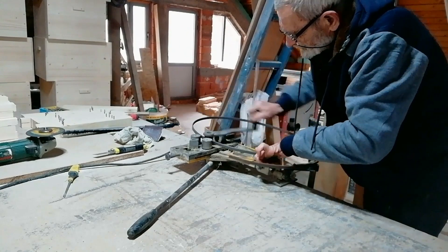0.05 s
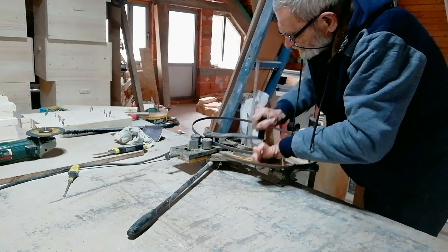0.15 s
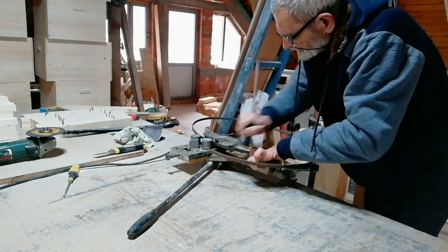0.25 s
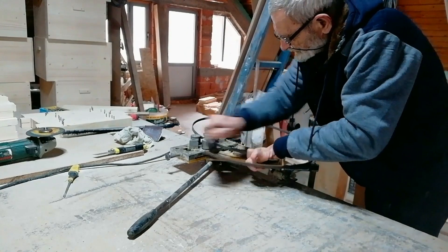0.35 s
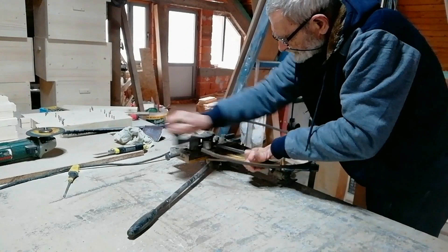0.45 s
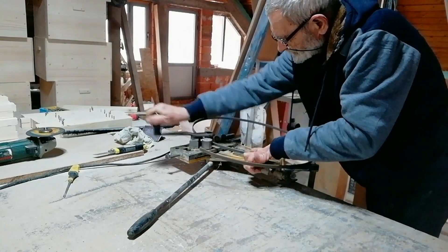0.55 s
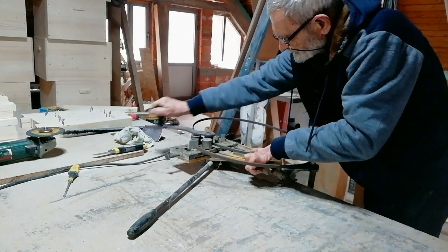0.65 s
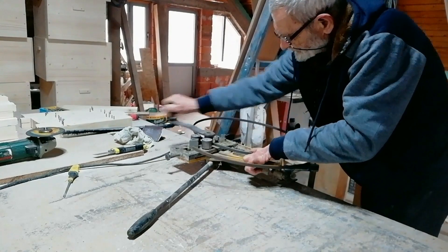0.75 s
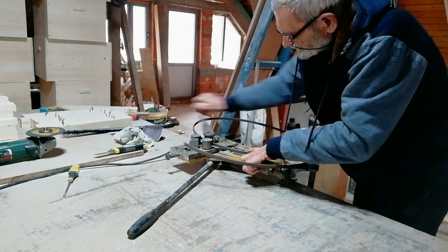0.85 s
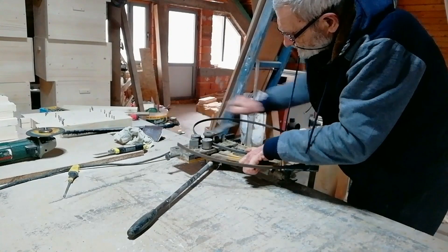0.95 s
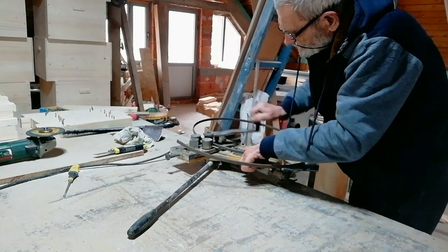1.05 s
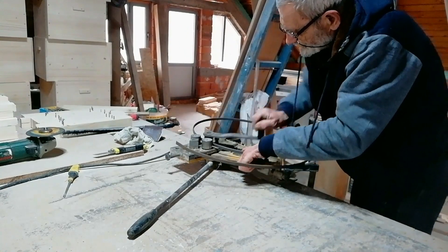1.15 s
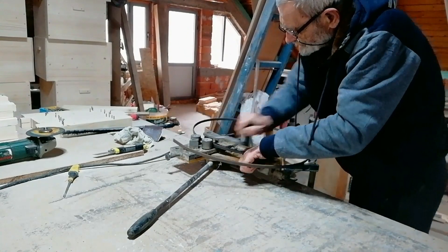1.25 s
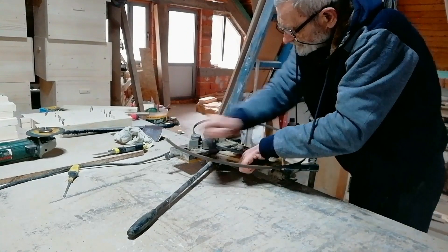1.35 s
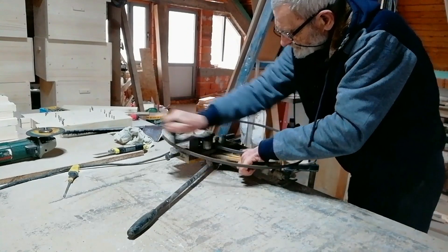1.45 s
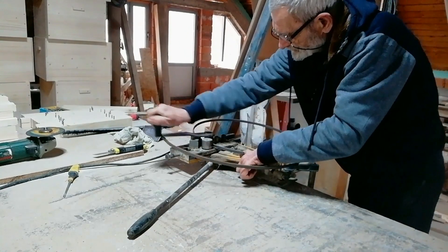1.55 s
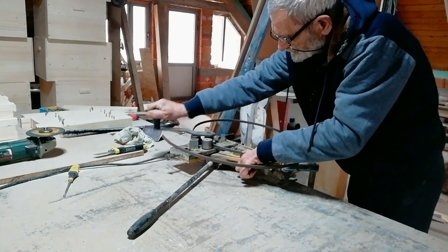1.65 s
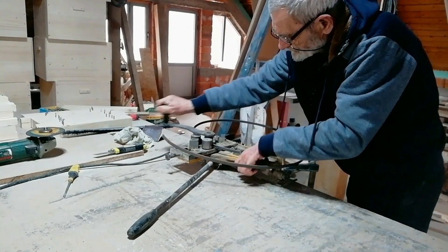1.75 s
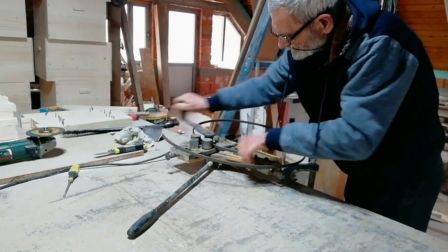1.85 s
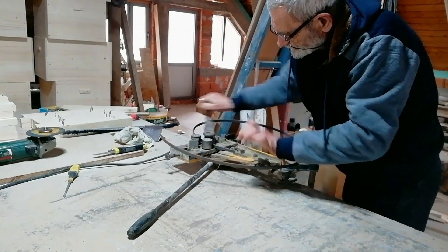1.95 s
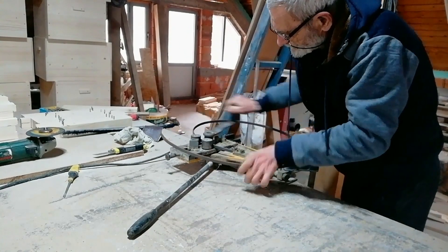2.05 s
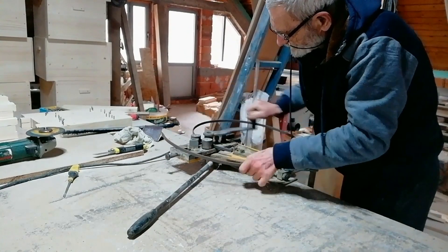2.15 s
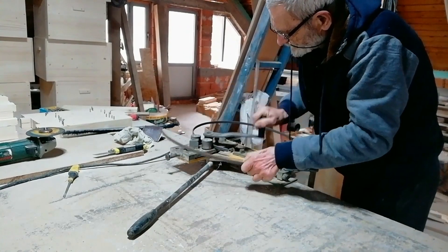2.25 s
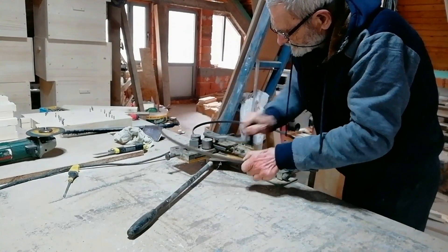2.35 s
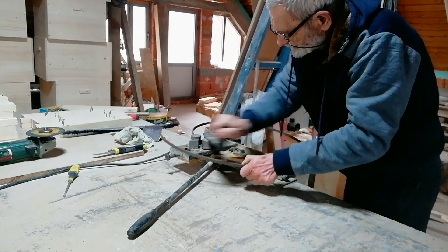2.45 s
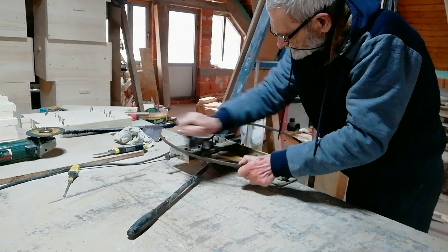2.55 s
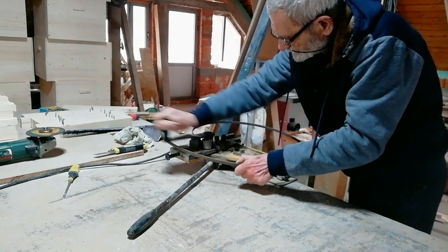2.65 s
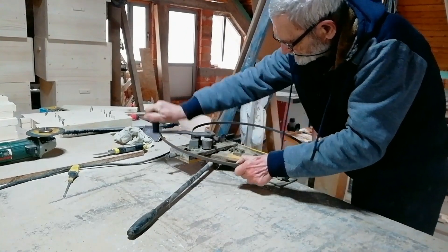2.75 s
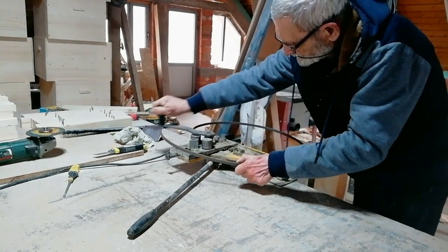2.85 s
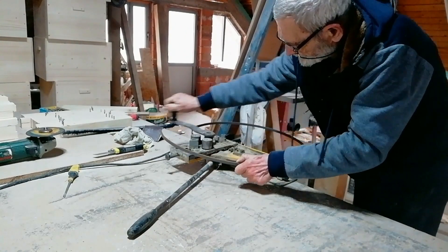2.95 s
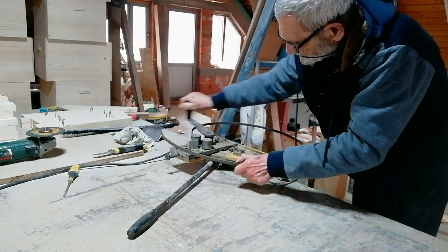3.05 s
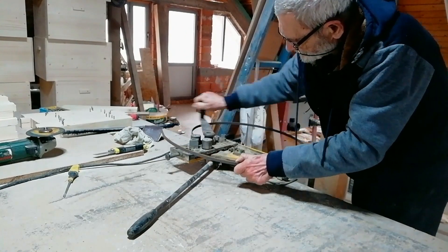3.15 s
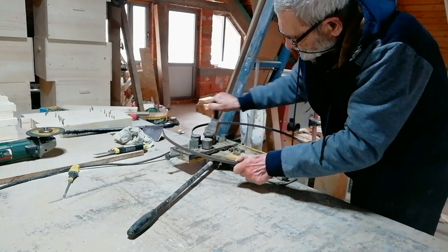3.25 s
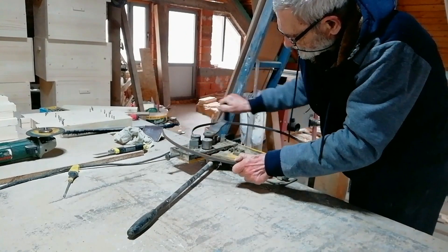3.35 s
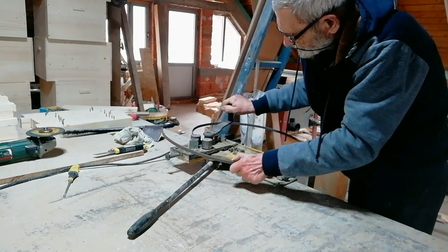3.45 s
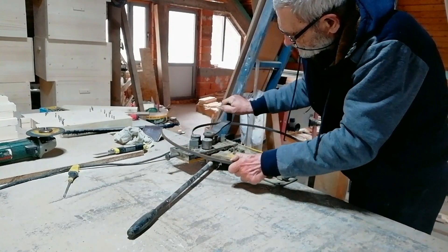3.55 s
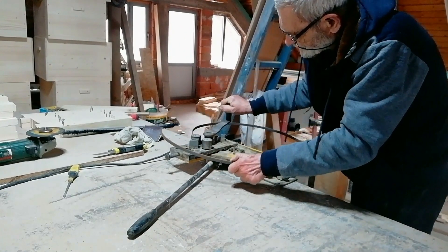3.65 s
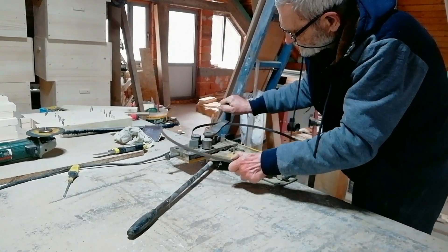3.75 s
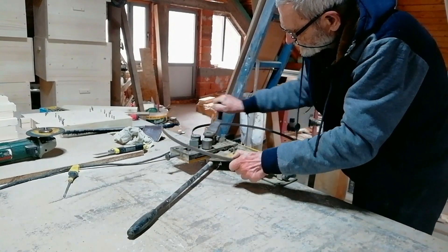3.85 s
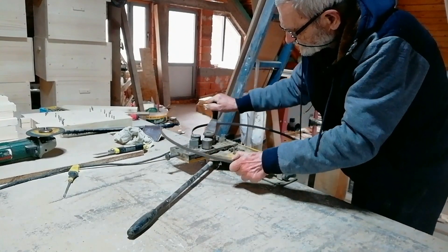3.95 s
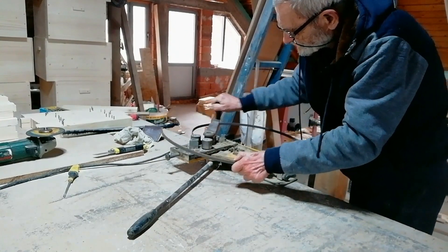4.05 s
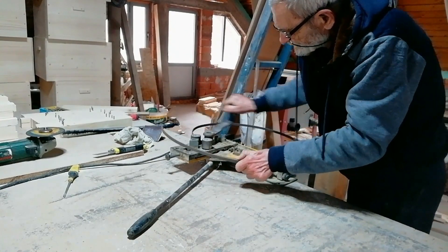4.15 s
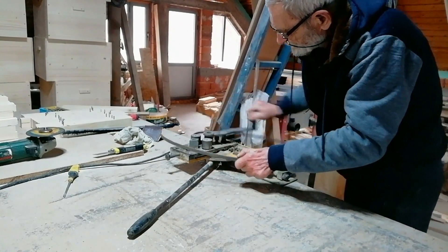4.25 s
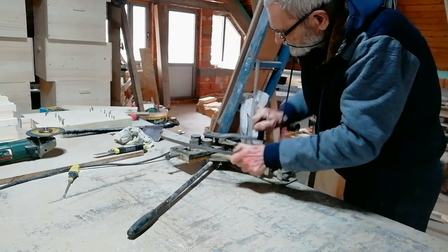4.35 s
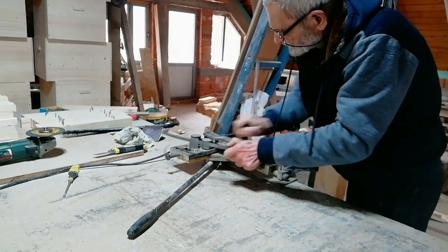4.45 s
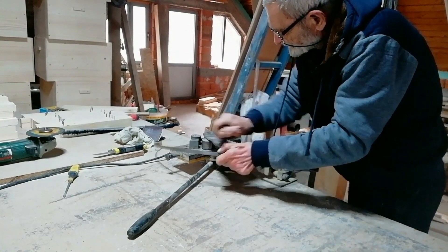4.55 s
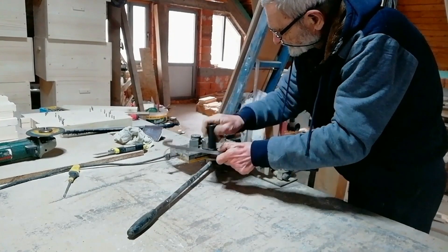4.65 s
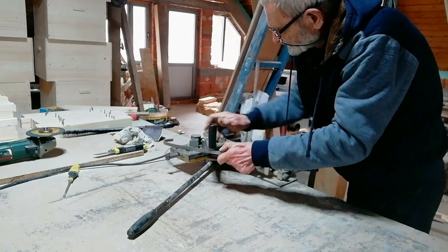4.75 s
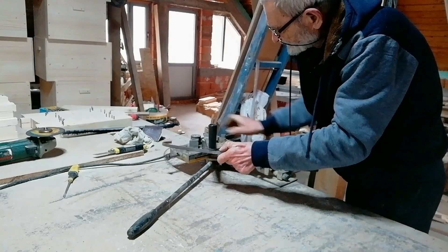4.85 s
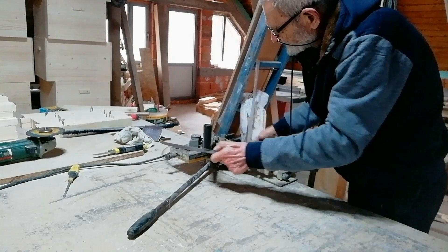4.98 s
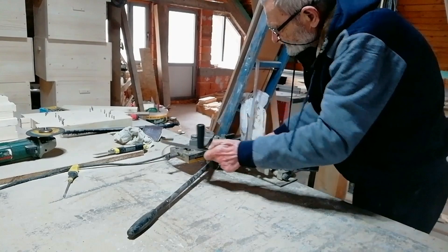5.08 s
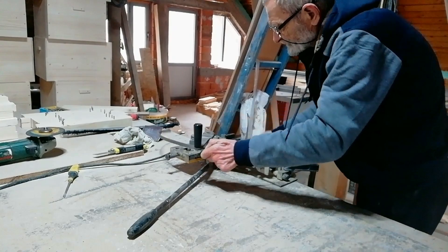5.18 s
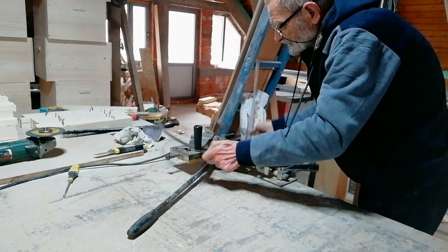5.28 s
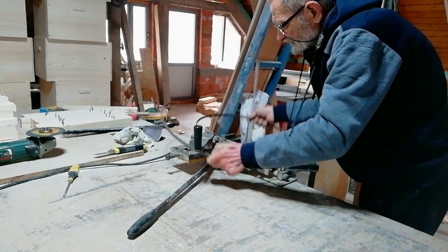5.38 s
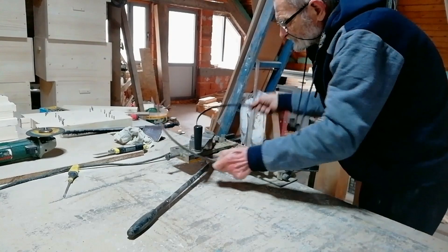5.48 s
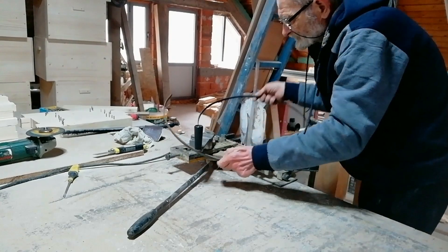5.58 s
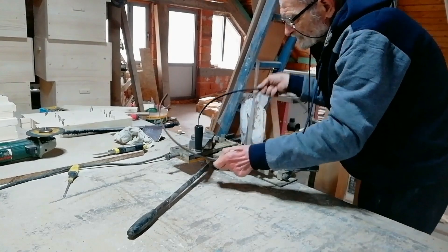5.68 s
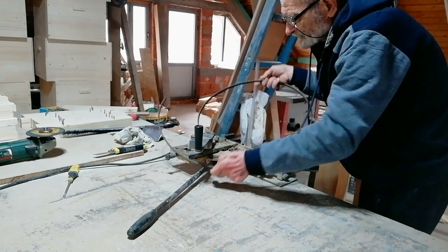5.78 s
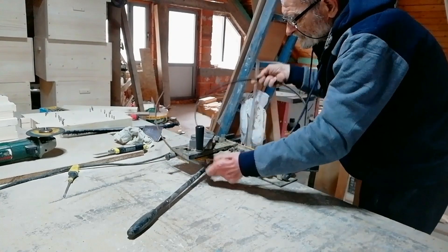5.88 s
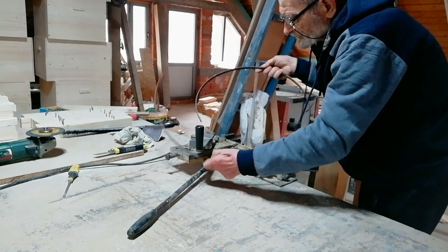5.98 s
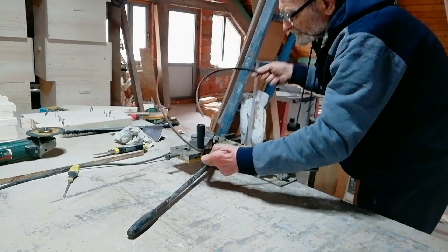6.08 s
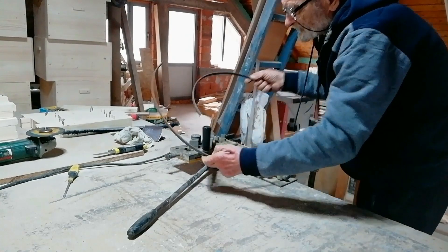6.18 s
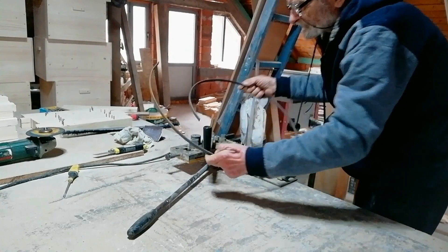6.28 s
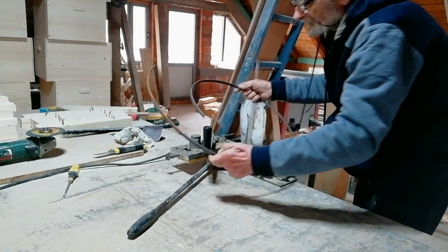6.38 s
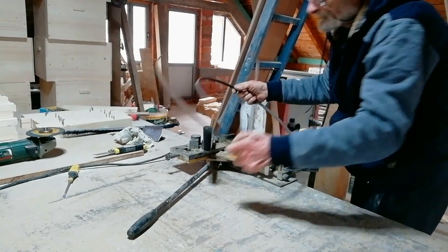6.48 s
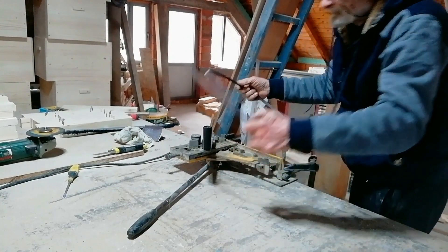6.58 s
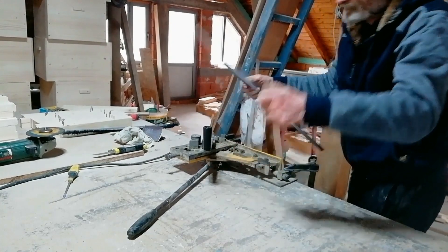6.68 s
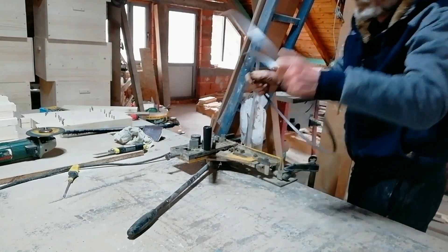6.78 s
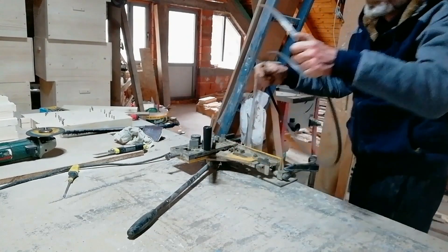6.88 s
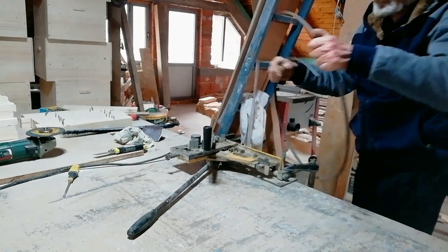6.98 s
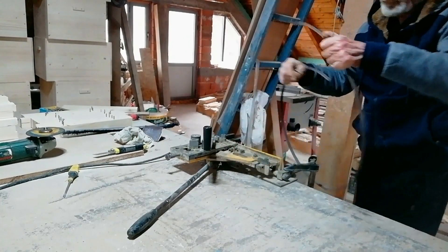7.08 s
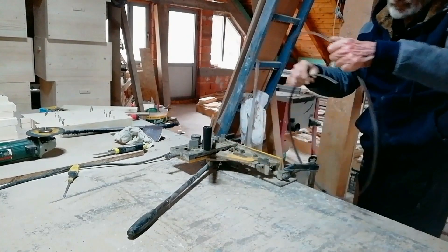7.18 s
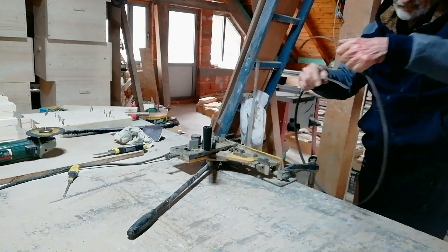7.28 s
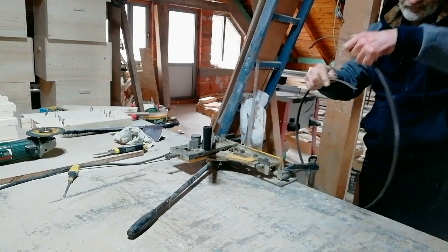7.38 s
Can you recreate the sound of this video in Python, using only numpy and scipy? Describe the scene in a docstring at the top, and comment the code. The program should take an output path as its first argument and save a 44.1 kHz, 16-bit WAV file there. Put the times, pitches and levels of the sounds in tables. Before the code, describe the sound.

Metal handwork in a small, briefly reverberant room. Soft sliding and low squeaks surround a ringing clank; another hard clack makes the bar twang and the bench thump. It goes nearly silent, then steel scrapes and bangs rapidly in the jig, with smaller clicks following. Two or three final knocks give way to a sleeve's airy rustle. The microphone is near the bench, with faint background air.

```python
"""A flat steel bar is worked through a hand bending jig on a wooden bench, in a small workshop.
First the bar slides over the rollers and clanks on the pins: random slips and noise bursts ring the steel.
Then it is scraped and knocked free. Squeaks, notes and twangs are gliding or fading sines, and low noise
makes the bench boom along. Small cloth rustles come early on; at the end a sleeve swishes, made of dense
slips, as the bent bar is lifted away. Quiet air noise lies under it all."""
import sys
import numpy as np
from scipy import signal
from scipy.fft import rfft, irfft, next_fast_len
from scipy.io import wavfile
from scipy.ndimage import uniform_filter1d, map_coordinates

SR = 44100
rng = np.random.default_rng(int(sys.argv[2]) if len(sys.argv) > 2 else 0)


def wav_record(signal):
    """Record a signal, one row per channel, as 16-bit PCM in the file named by sys.argv[1]."""
    frames = np.transpose(np.atleast_2d(signal))
    bounded = np.clip(frames, -1, 1)
    # unit amplitude maps onto the largest positive 16-bit level
    quanta = np.round(bounded * 32767).astype(np.int16)
    wavfile.write(sys.argv[1], SR, quanta)


N = 327222  # length in samples
PORT_LAG = 27  # samples by which the direct sound reaches the left port later

# The jig on its bench rings at these pitches. Each row: pitch in Hz, width in Hz, level in dB.
FRAME_MODES = [(454, 6.8, 4.5), (733, 159.6, -0.5), (890, 12, 3), (1020, 52, 1), (1268, 210, -1),
               (1586, 12.5, -13.5), (1966, 38, -5), (2418, 32.8, -11), (3160, 100, -8), (3322, 120, -8.5)]
# The pitches at which the steel pins ring, in Hz.
PIN_HZ = [1398, 2805, 3720, 5469, 6320, 7001, 8626, 9040, 9394, 10515, 10884]
# How each of those pitches rings. Each row: level in dB, time to fall by 60 dB in seconds.
PIN_RING = [(-22, 0.45), (-29.5, 0.33), (-32, 0.31), (-27, 0.24), (-36, .2), (-23.5, 0.18), (-21, 0.14),
            (-8, 0.14), (-3, 0.2), (-7.5, 0.22), (-3, 0.11)]
# How a push takes hold, swells and dies: attack in seconds, swell in dB, release in dB a second.
PUSH_SHAPE = (0.0653, 0.99, 161)


def amp(db):
    """Turn decibels into a gain."""
    return 10 ** (np.asarray(db) / 20)


def unit(x):
    """Scale to an average (rms) level of 1."""
    return x / np.sqrt(np.mean(x ** 2) + 1e-20)


def along(points, hz):
    """Read a curve of (Hz, value) points, with pitch on a log axis."""
    f, v = np.transpose(points)
    return np.interp(np.log(hz + 1), np.log(f + 1), v)


def wobble(rate):
    """A smooth random curve with `rate` random points a second."""
    knots = rng.standard_normal(int(N * rate / SR) + 4)
    return map_coordinates(knots, [np.arange(N) * rate / SR])


def filtered(x, response):
    """Multiply the spectrum of x by a response that depends on pitch."""
    m = next_fast_len(N + 8192)
    return irfft(rfft(x, m) * response(np.fft.rfftfreq(m, 1 / SR)), m)[..., :N]


def coloured(x, spectrum):
    """Shape x by the given spectrum, at rms 1."""
    return unit(filtered(x, lambda hz: amp(along(spectrum, hz))))


def band(x, lo_hz, hi_hz, order=3):
    """Keep the pitches between two edges."""
    edges_hz = [lo_hz, min(hi_hz, SR / 2 - 1)]
    return signal.sosfilt(signal.butter(order, edges_hz, "band", fs=SR, output="sos"), x)


def add(track, s, sound):
    """Mix a sound into a track at s seconds."""
    start = max(round(s * SR), 0)
    track[..., start:start + sound.shape[-1]] += sound[..., :N - start]


def ringing(x, modes):
    """The answer of resonances (Hz, width Hz, dB) to x."""
    def response(f):
        return sum(amp(db) * 1j * f * width / (hz * hz - f * f + 1j * f * width)
                   for hz, width, db in modes)
    return filtered(x, response)


def resonate(x, modes, share_db):
    """Mix x with its own ringing, at rms 1."""
    return unit(unit(x) + amp(share_db) * unit(ringing(x, modes)))


def evened(x, width_hz=350):
    """Level out the chance peaks and dips in a short burst's spectrum: a clean, broad crack."""
    z = rfft(x)
    power = np.abs(uniform_filter1d(np.abs(z) ** 2, int(width_hz * len(x) / SR)))
    return irfft(z * np.sqrt(power.mean() / (power + 1e-12)), len(x))


def diffuse(size, merge_hz=330):
    """Noise at two ports: alike in the bass, unrelated above."""
    hz = np.fft.rfftfreq(size, 1 / SR)
    turn = np.arccos(.96 / (1 + (hz / merge_hz) ** 4)) / 2
    noise = rfft(rng.standard_normal((2, size)))
    mid, side = irfft(noise * [np.cos(turn), np.sin(turn)], size)
    return np.array([mid + side, mid - side])


def workshop(direct_db, near_db=3, near_t60=0.055):
    """Echo pattern at two ports: the direct path, close echoes off the bench, then the room's tail."""
    # Each row: pitch in Hz, time for the room's tail to fall by 60 dB in seconds.
    room_decay = [(100, 1), (300, 0.61), (1000, 0.43), (3000, 0.34), (7000, 0.3), (14000, 0.21)]
    hz, t, z = signal.stft(diffuse(size=SR // 2), SR, nperseg=256)
    tail = amp(-60 * t / along(room_decay, hz)[:, None])
    near = amp(near_db - 60 * t / near_t60)
    response = signal.istft(z * (tail + near), SR, nperseg=256)[1]
    response /= np.linalg.norm(response[0])
    response[[0, 1], [PORT_LAG, 0]] += amp(direct_db)
    return response


def friction(rate, spread_db, direct_db):
    """Tiny slips of unequal size at a spot that moves between two places, each with its own echoes."""
    place = (1 + np.tanh(1.5 * wobble(6))) / 2
    out = np.zeros((2, N))
    for share in (place, 1 - place):
        size = amp(spread_db * np.minimum(rng.exponential(size=N), 2))
        happens = rng.random(N) < share * rate / SR  # rate: slips a second
        slips = happens * rng.uniform(-1.02, 1, N) * size
        out += signal.fftconvolve(slips[None], workshop(direct_db), axes=1)[:, :N]
    return out


def stroke(start, length, attack_s, swell_db, release_db):
    """Gain of one movement: it eases in, swells by swell_db to its end, then falls by release_db a second."""
    t = np.arange(N) / SR - start
    to_go = np.clip(1 - t / length, 0, 1)
    ease_in = (1 + np.tanh(2 * t / attack_s)) / 2
    return ease_in * amp(-swell_db * to_go - release_db * np.maximum(t - length, 0))


def strokes(rows, shape):
    """Rub, grind and hiss gains of a series of movements; their powers add."""
    power = 0
    for s, length, db, grind_db, hiss_db in rows:
        peaks = amp([db, db + grind_db, db + hiss_db])
        power = power + np.outer(peaks, stroke(s, length, *shape)) ** 2
    return np.sqrt(power)


def rubbing(slips, tone, levels, frame_db, steel_db, split_hz=1400):
    """Slips shake the jig's frame (a low rub, a harder grind) and, higher up, its steel pins."""
    # Colour of the hiss. Each row: pitch in Hz, level in dB per Hz.
    hiss_tone = [(2350, -12), (4000, -3), (5220, -15), (7660, 0.5), (9330, -1.5), (10800, -0.5),
                 (14900, -18), (15600, -31), (16000, -62.5)]
    # a shorter ring makes a wider resonance
    pins = [(hz, 2.8 / t60 + 25, db) for hz, (db, t60) in zip(PIN_HZ, PIN_RING)]
    body = resonate(coloured(slips, tone), FRAME_MODES, frame_db)
    low = filtered(body, lambda hz: 1 / (1 + (hz / split_hz) ** 4))
    high = resonate(coloured(slips, hiss_tone), pins, steel_db)
    rub, grind, hiss = levels
    return rub * unit(low) + grind * unit(body - low) + hiss * high


def drifting(x, depth=.45, trip_s=.0022, travel_s=.0004):
    """The wave that returns from the bar's end: its delay changes as the contact moves, so resonances drift."""
    delay = (trip_s + travel_s * wobble(4)) * SR
    now = np.arange(N)
    return x + depth * np.array([np.interp(now - delay, now, port) for port in x])


def sliding(pushes):
    """The bar runs over the rollers with a soft, hollow rub."""
    # Colour of the rub and grind. Each row: pitch in Hz, level in dB per Hz.
    slide_tone = [(100, -28.5), (170, -17), (226, -7.5), (286, 1), (404, -19.5), (448, -7.5), (595, -16),
                  (903, -13.5), (1520, -24), (6000, -40.5), (7800, -72.5), (13200, -120)]
    levels = pushes * amp([[1.5], [1.5], [0]])  # trims of rub, grind and hiss in dB
    slips = friction(rate=1600, spread_db=2.0, direct_db=-28.5)
    slips = slips * amp(1.2 * wobble(34))
    return rubbing(drifting(slips), slide_tone, levels, frame_db=-2, steel_db=-14)


def scraping(drags):
    """The bar's edge catches and lets go on the pins: a coarse, bright scrape."""
    # Colour of the rub and grind. Each row: pitch in Hz, level in dB per Hz.
    scrape_tone = [(82, -5), (140, -15), (289, 7.5), (414, -7.5), (455, 9), (614, -2), (984, -2.5),
                   (1100, -7.5), (3150, -18.5), (6000, -18.5), (7800, -25), (13200, -120)]
    levels = drags * amp([[1.5], [.5], [-.5]])  # trims of rub, grind and hiss in dB
    slips = friction(rate=1200, spread_db=4, direct_db=-9.5) * amp(2.1 * wobble(45))
    return rubbing(slips, scrape_tone, levels, frame_db=-10.5, steel_db=-34)


def blow(lead_db, tail_db, size, snap_t60=0.01443, chatter_t60=0.089, chatter_db=-9, lead_t60=0.0825):
    """A graze of size samples, a snap that goes straight to the ports, then chatter that fills the room."""
    t = np.arange(size) / SR
    graze = amp(lead_db - 60 * t[::-1] / lead_t60) * np.linspace(0, 1, size)
    snap_shape = np.r_[graze, amp(-60 * t / snap_t60)]
    snap = evened(snap_shape * rng.standard_normal(2 * size))
    chatter_shape = np.pad(amp(chatter_db - 60 * t / chatter_t60), (size, 0))
    chatter = chatter_shape * rng.standard_normal(2 * size)
    echoes = signal.fftconvolve((snap + chatter)[None], workshop(direct_db=-36.5), axes=1)
    echoes = echoes[:, :size + SR // 2]
    sound = amp(tail_db + 13.5) * np.array([evened(port) for port in echoes])
    add(sound[0], PORT_LAG / SR, snap)
    add(sound[1], 0, snap)
    return sound


def contacts(frame_db=-1):
    """Steel hits steel: each blow has its own colour, rings the pins and shakes the jig's frame."""
    # Each row: time in seconds, clack in dB, body in dB over the clack, ping in dB over the clack,
    # pin ring in dB over the ping, graze in dB before the snap, room in dB.
    # These levels stand before the fixed trims added below and in blow().
    blows = [(0.219, -44, 7, -1.5, -13, -9, 8), (0.3909, -31, -2, 12.5, -2.5, -32, 23),
             (1.039, -68.5, 12.5, 5, -14, -18, 2), (1.404, -57, 20.5, -14, -15.5, -6.5, 0),
             (1.5342, -45, 2, 6, -31, -15, 18), (2.4047, -31.5, -4, -10, -18, -19, -17),
             (2.4213, -42.5, 3.5, -4, -18, -27, -12), (2.4373, -45, 3, -6.5, -16, -23, -2),
             (2.5846, -51.5, 6, -17, -21, -27, -14), (2.598, -56.5, 6.5, -18, -22, -33, -8),
             (3.9724, -53, -8, -9, -12, -17.5, -14), (4.196, -28, -5.5, -9, -24.5, -20.5, -9),
             (4.208, -40, -2, -6, -20, -24, -14), (4.2451, -30.5, -7.5, -27, -14, -34, -6),
             (4.304, -44, -2, 3, -12, -10, -14), (4.3195, -31, -12, -6, -3, -23, -3),
             (4.3939, -32, 2.5, -19, -9.5, -14, -11.5), (4.348, -41.5, -4, -8, -14, -20, -16),
             (4.4336, -39, -7, -15, -14, -25, -20), (4.4492, -37, -12, 4, -24, -28, -20),
             (4.462, -23, -4, -4, -10.5, -17, -4), (4.4674, -35, 2, 5, -13, -16, -10),
             (4.5106, -33.5, -2, -9, -13, -22, -10), (4.5201, -47, 2, 19, -5.5, -7, 13.5),
             (4.562, -39.5, 7.5, -16, -9.5, -25, -14), (4.596, -47.5, -1, 14.5, -10, -15.5, -4),
             (4.6128, -29.5, -5.5, 7.5, -20.5, -17, -9), (4.927, -65, 11.5, -14, -15, -23, 2),
             (4.973, -41, -6, 16, -11, -25.5, -4), (5.008, -40, -7, -5, -18, -22, -6),
             (5.126, -56, 15, -1, -7.5, -23, -9), (5.252, -49, 10, -6, -15.5, -12, -8),
             (5.262, -50, -6, 10, -12.5, -21, -6), (5.272, -43.5, -12, 6.5, -11, -18, -6),
             (5.2975, -35, -4, 2, -9.5, -7, -12), (5.358, -52.5, 3, 13, -19, -22, -10),
             (5.4656, -47, 0.5, 15, -10.5, -18, -9.5), (5.7865, -27, -3, 3, -14, -17.5, -9.5),
             (5.8076, -33, -4, 5, -24, -26, -4), (6.0498, -30, -14.5, 4, -21, -34, -6),
             (6.158, -45.5, -8, 2.5, -22, -21, -20), (6.194, -45.5, -23, 1, -16, -12, -15)]
    thud_db, ping_pan_db = -8, 0.5  # thud trim against the body; left-right tilt of the treble
    # the ping's upper edge rises with its level in the row: Hz at 0 dB, Hz per dB
    ping_top_hz, ping_top_hz_per_db = 10790, 135.5
    out, t = np.zeros((2, N)), np.arange(SR // 2) / SR
    lead, attack = SR // 20, SR // 50  # samples
    bands_hz = [(130, 330), (550, 2200), (2200, 4500)]  # thud, knock, clack
    hz, level, t60 = np.column_stack([PIN_HZ, PIN_RING]).T[:, :, None]
    pan = amp([[ping_pan_db / 2], [-ping_pan_db / 2]])

    def part(x):
        """Scale to rms 1 over the attack."""
        return x / np.sqrt(np.mean(x[:, lead:lead + attack] ** 2))

    for s, db, body_db, ping_db, ring_db, graze_db, room_db in blows:
        hit = blow(graze_db, room_db, size=lead)
        thud, knock, clack = [part(band(hit, lo, hi, order=2)) for lo, hi in bands_hz]
        top_hz = max(ping_top_hz + ping_top_hz_per_db * ping_db, 7000)
        ping = part(band(hit, 5100, top_hz))
        swings = np.sin(2 * np.pi * (hz * t + rng.random((2, len(hz), 1))))
        uneven_db = rng.normal(0, 0.94, (2, len(hz), 1))
        ring = (amp(level + uneven_db - 60 * t / t60) * swings).sum(axis=1)
        ring = part(np.pad(ring, ((0, 0), (lead, 0))))
        treble = (ping + amp(ring_db + 4.5) * ring) * pan
        sound = amp(body_db + thud_db) * thud + amp(body_db - 5.5) * knock
        sound = sound - amp(-6.0) * clack + amp(ping_db - 6.5) * treble
        add(out, s - lead / SR, amp(db) * sound)
    return out + amp(frame_db) * ringing(out, FRAME_MODES)


def notes(waver=.55, flutter_db=3):
    """Fading sines struck from the bar; the room makes them flutter differently at each port."""
    # The note of a blow, set by where the bar is struck.
    # Each row: time in seconds, pitch in Hz, level in dB, time to fall by 60 dB in seconds.
    struck = [(0.392, 8940, -35, .09), (0.392, 10512, -22, 0.098), (0.394, 552, -39, 0.25),
              (0.393, 1248, -40.5, 0.46), (0.395, 1685, -41, 0.43), (0.392, 2412, -43, 0.29),
              (0.392, 4425, -37, 0.14), (1.04, 1120, -42.5, 0.029), (2.405, 1990, -37, 0.16),
              (2.405, 3015, -32, 0.12), (2.405, 3570, -33, 0.072), (2.405, 3990, -36, 0.099),
              (2.41, 705, -40, 0.22), (2.41, 775, -45, 0.44), (2.41, 1015, -50, 0.27),
              (2.41, 1583, -48, 0.32), (4.196, 2900, -24, 0.019), (4.196, 4120, -21.5, 0.02),
              (4.196, 5100, -27, .015), (4.2452, 3280, -29, 0.055), (4.3208, 3320, -23, 0.029),
              (4.4617, 3300, -22, 0.028), (4.394, 2450, -39, .3), (4.505, 1007, -31, 0.33),
              (4.462, 1445, -33.5, .35), (4.462, 2003, -37.5, 0.52), (4.521, 10610, -39.5, 0.18),
              (4.612, 6600, -37.5, 0.27), (4.612, 9030, -28.5, 0.14), (4.612, 9940, -26.5, 0.11),
              (4.612, 3472, -38, 0.33), (5.787, 790, -40, 0.18), (5.787, 1290, -35, 0.18),
              (5.787, 1370, -30.5, 0.19), (5.787, 1413, -32, 0.19), (5.787, 1588, -31, .15),
              (5.787, 3330, -39, 0.27), (5.787, 6826, -43, .22), (6.05, 3210, -37.5, 0.14),
              (6.05, 7380, -31, 0.14)]
    out, t = np.zeros((2, N)), np.arange(SR // 2) / SR
    knots = rng.standard_normal((len(struck), 2, 2, 32))  # note, port, level or phase, points

    def slow(points):
        """A smooth curve through 60 points a second."""
        return map_coordinates(points, [t * 60])

    for (s, hz, db, t60), ports in zip(struck, knots):
        for port, (level, phase) in zip(out, ports):
            gain = amp(db - 60 * t / t60 + flutter_db * slow(level))
            turns = hz * t + phase[-1]  # the last point sets the starting phase
            add(port, s, gain * np.sin(2 * np.pi * turns + waver * slow(phase)))
    return out


def twangs(rise_share=0.035, waver=0.42):
    """The free end of the bar swings, unevenly damped by the hand; long swings build up slowly."""
    # The free length sets most pitches; the rows near 452 Hz are the jig frame ringing at its own mode. Each
    # row: time in seconds, pitch in Hz, level in dB, time to fall by 60 dB in seconds.
    swings = [(0.145, 182, -33, 1), (0.23, 451, -36, 0.35), (0.396, 453, -44, 0.55),
              (0.415, 184.7, -28.5, 0.64), (0.658, 150.6, -40, 0.4), (2.408, 488, -33.5, 0.16),
              (2.419, 184.3, -31, 0.34), (3.374, 248, -51.5, 0.91), (4.459, 238, -29, 0.16),
              (4.501, 113, -29.5, 0.35), (4.612, 122.2, -47.5, 1), (5.021, 186.6, -33.5, 0.37),
              (5.787, 263, -18, 0.072), (5.79, 169.6, -30.5, 0.28), (6.052, 222, -33, 0.1),
              (6.154, 118.8, -36.5, 0.67)]
    out, t = np.zeros(N), np.arange(SR) / SR
    for s, hz, db, t60 in swings:
        grip_db = 1.3 * wobble(28)[:SR]
        fade = amp(db - 60 * t / t60 + grip_db)
        rise = 1 - np.exp(-t / (rise_share * t60))
        phase = 2 * np.pi * hz * t + waver * wobble(30.0)[:SR]
        add(out, s, fade * rise * np.sin(phase))
    return out


def squeaks(rough=.55, rise_s=.002):
    """Short stick-slip notes with a ragged phase, gliding as the bar moves."""
    # Each row: start in seconds, length in seconds, first pitch in Hz, last pitch in Hz,
    # level in dB before the room and the trim.
    glides = [(0.131, .045, 1420, 1330, -42), (0.17, .11, 1300, 1180, -45), (0.65, .08, 1030, 950, -53),
              (0.777, .17, 950, 870, -46), (1.21, .13, 750, 780, -45), (1.335, .1, 980, 1040, -42),
              (4.405, .03, 350, 280, -33), (4.618, .04, 880, 620, -39), (4.772, .03, 990, 1030, -47),
              (5.14, .08, 1630, 1570, -50.5), (5.815, .065, 380, 520, -43), (5.843, .035, 600, 690, -50)]
    out = np.zeros(N)
    for s, length, first_hz, last_hz, db in glides:
        t = np.arange(int(length * SR)) / SR
        turns = np.cumsum(np.linspace(first_hz, last_hz, len(t))) / SR
        phase = 2 * np.pi * turns + rough * wobble(250.0)[:len(t)]
        shape = (1 - np.exp(-t / rise_s)) * np.sqrt(1 - t / length)
        add(out, s, amp(db) * shape * np.sin(phase))
    return amp(-3) * signal.fftconvolve(out[None], workshop(direct_db=4), axes=1)[:, :N]


def grit(pushes, drags):
    """Mill scale and burrs crack under the moving bar: separate small ticks that follow the rubbing."""
    # Colour of the ticks. Each row: pitch in Hz, level in dB per Hz.
    grit_tone = [(150, -13), (500, -16.5), (1200, -6.5), (2500, -2.5), (4500, -12.5), (9000, -25.5),
                 (14000, -32.5)]
    push_db, drag_db = -12.5, -8.5  # against the rub gains passed in
    ticks = coloured(friction(rate=110, spread_db=2, direct_db=-1), grit_tone)
    return ticks * (amp(push_db) * pushes[0] + amp(drag_db) * drags[0])


def bench(pushes, drags):
    """The bench top booms along with the rubbing, and rings on after each thump."""
    # The jig is leaned on and thumps the bench top.
    # Each row: time in seconds, level in dB before the trim at the end.
    leans = [(0.0, -53), (0.32, -44.5), (0.44, -39.5), (0.92, -45.5), (1.441, -42.5), (1.55, -58),
             (1.971, -47), (2.42, -41.5), (3.42, -52), (4.49, -39.5), (4.62, -56), (4.715, -40.5),
             (5.0, -43), (5.281, -39), (5.44, -49), (5.86, -43), (6.055, -43.5), (6.155, -37.5)]
    # Colour of the boom. Each row: pitch in Hz, level in dB per Hz.
    boom_tone = [(21, -54), (35, -26.5), (48, -14.5), (92, -0.5), (114, 3.5), (146, -4.5), (172, -5),
                 (190, -3), (250, -33), (420, -120)]
    rise_s, fade_db_per_s = 0.012, 60.5
    slide_db, scrape_db = -4, 0.5  # share of each rub that reaches the bench
    thumps = sum((amp(db) * stroke(s, rise_s, rise_s, 0, fade_db_per_s)) ** 2 for s, db in leans)
    rubs = (amp(slide_db) * pushes[0]) ** 2 + (amp(scrape_db) * drags[0]) ** 2
    return np.sqrt(thumps + rubs) * amp(-2) * coloured(diffuse(size=N), boom_tone)


def sleeve():
    """Fleece swishes and rubs as the arm reaches, and flaps too as it lifts the bar away."""
    # The arm lifts the bar away. Each row: time in seconds, level in dB before the trims below.
    lift = [(6.45, -82), (6.46, -77), (6.578, -61), (6.745, -52.5), (6.778, -47.5), (6.805, -50),
            (6.88, -45.5), (6.97, -45), (7.015, -48.5), (7.178, -54.5), (7.246, -75.5), (7.314, -63.5),
            (7.42, -59)]
    # The arm reaches or brushes the jacket.
    # Each row: start in seconds, length in seconds, swish in dB, rub in dB.
    reach_rows = [(0.0, 0.14, -65.5, -65), (0.587, 0.37, -66, -70), (1.08, 0.171, -64.5, -66.5),
                  (7.063, 0.07, -63, -51.5)]
    # Colour of the rub. Each row: pitch in Hz, level in dB per Hz.
    cloth_tone = [(350, -24), (600, -3.5), (1190, -0.5), (2450, -1), (5000, -10), (6500, -34.5),
                  (11000, -120)]
    # Colour of the swish. Each row: pitch in Hz, level in dB per Hz.
    swish_tone = [(1760, -71), (3000, -21), (3570, -6.5), (4230, -7), (4660, -4), (6710, -0.5),
                  (10300, 3.5), (16000, -8.5)]
    flap_db, flap_follows = -62, 0.14  # level at the loudest swish; dB per dB of swish
    catch_db, flutter_db, pan_db = -7, .9, -2  # catches against smooth slips; flutter; left-right

    times, levels = np.transpose(lift)
    lift_db = np.interp(np.arange(N) / SR, times, levels, left=-200)
    flap = amp(flap_db + flap_follows * (lift_db - levels.max()))
    reaches = sum(np.outer(amp([swish_db, rub_db]), stroke(s, length, *PUSH_SHAPE))
                  for s, length, swish_db, rub_db in reach_rows)
    swish, rub = amp([lift_db + 0.5, lift_db - 11]) + reaches

    fibres = unit(friction(rate=6100, spread_db=4.0, direct_db=-19.0))
    # folds of the cloth catch and let go
    catches = unit(friction(rate=380, spread_db=6, direct_db=-4))
    fibres = (fibres + amp(catch_db) * catches) * amp(flutter_db * wobble(30))

    flapping = flap * unit(band(fibres, 88, 360))
    rubs = rub * coloured(fibres, cloth_tone)
    swishes = swish * coloured(fibres, swish_tone) * amp([[pan_db / 2], [-pan_db / 2]])
    return flapping + rubs + swishes


def air():
    """The quiet air of the workshop: steady noise, strongest in the bass."""
    # Colour of the air. Each row: pitch in Hz, level in dB per Hz.
    air_tone = [(12, -25.5), (20, -18.5), (55, -9), (86, -19), (123, -4.5), (146, -17.5), (204, -23),
                (380, -25.5), (607, -23), (780, -27), (923, -25.5), (2020, -30.5), (3440, -32.5),
                (4060, -33.5), (10200, -34.5), (16000, -42.5)]
    return amp(-61.5) * coloured(diffuse(size=N), air_tone)


def scene():
    """All the sources, tilted between left and right, over the quiet air of the workshop."""
    # In both tables the levels are gains before the trims of each source.
    # The bar pushed over the rollers. Each row: start in seconds, length in seconds, rub in dB,
    # grind in dB over the rub, hiss in dB over the rub.
    push_rows = [(0.0, 0.15, -67.5, -24, -3), (0.135, 0.15, -45, -7, -9), (0.57, 0.0094, -51.5, -8, -7),
                 (0.66, 0.14, -50, -17, -13.5), (0.778, 0.12, -45, -9, -15.5), (0.93, 0.046, -63, -22, -1),
                 (1.205, 0.21, -46, -2.5, -10.5), (1.385, 0.012, -44.5, -4, -29),
                 (1.44, 0.06, -52, -13, -25), (1.865, 0.08, -52, -4, -3.5), (2.188, 0.033, -53, -7, -4.5),
                 (2.555, 0.028, -45.5, -26, -19.5), (3.36, 0.11, -56.5, 1.5, -4),
                 (3.46, 0.16, -64.5, 4.5, -7)]
    # The bar's edge dragged along the pins. Each row: start in seconds, length in seconds, rub in dB,
    # grind in dB over the rub, hiss in dB over the rub.
    drag_rows = [(4.216, 0.2, -41.5, -4.5, -3), (4.295, 0.12, -45.5, 2, -4), (4.459, 0.055, -40.5, 4, 5),
                 (4.56, 0.079, -39, -1, -9), (4.755, 0.045, -53.5, -23, -28),
                 (4.955, 0.083, -42, -6.5, -33), (4.99, 0.01, -55, -3, 11), (5.06, 0.046, -55.5, 1.5, -8),
                 (5.14, 0.027, -43.5, -10, -15), (5.258, 0.056, -44.5, 3.5, 5.5),
                 (5.335, 0.043, -49.5, 0.5, -2), (5.779, 0.011, -42.5, 5, -4),
                 (5.9, 0.046, -71.5, 18.5, 16.5), (6.115, 0.013, -42.5, 5, -2),
                 (6.155, 0.051, -51.5, 3.5, -5)]
    # How a drag takes hold, swells and dies: attack in seconds, swell in dB, release in dB a second.
    drag_shape = (0.047, 2.2, 267)
    # Microphone colour. Each row: pitch in Hz, left-right difference in dB.
    tilt = [(300, 0), (700, -3), (1300, 0), (2400, 0.5), (4400, 1), (7500, 1), (9500, 10.5), (13000, 6)]
    pushes, drags = strokes(push_rows, PUSH_SHAPE), strokes(drag_rows, drag_shape)
    work = sliding(pushes) + scraping(drags)
    work = work + contacts() + notes() + twangs()
    work = work + squeaks() + grit(pushes, drags)
    work = work + bench(pushes, drags) + sleeve()
    return filtered(work, lambda hz: amp(np.outer([.5, -.5], along(tilt, hz)))) + air()


def record(dry):
    """Nothing at or above 15850 Hz is kept."""
    return filtered(dry, lambda hz: hz < 15850)


dry = scene()
out = record(dry)
wav_record(out)
```